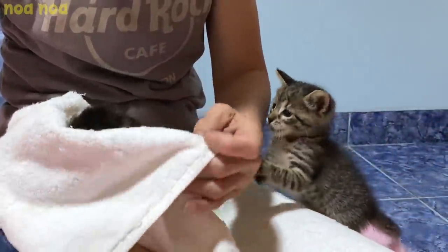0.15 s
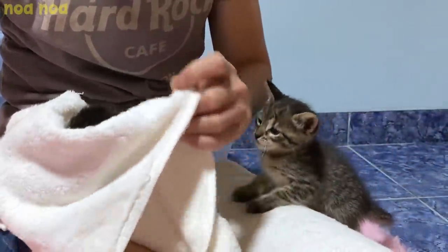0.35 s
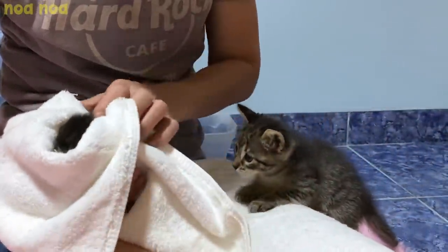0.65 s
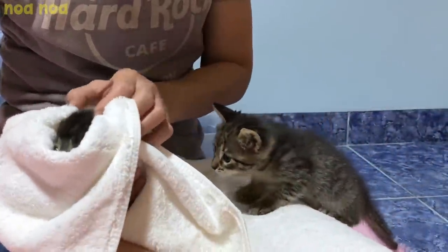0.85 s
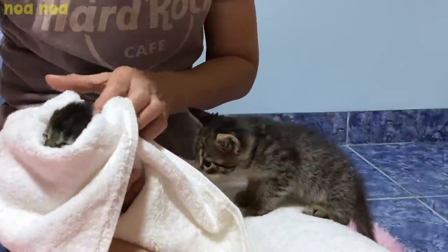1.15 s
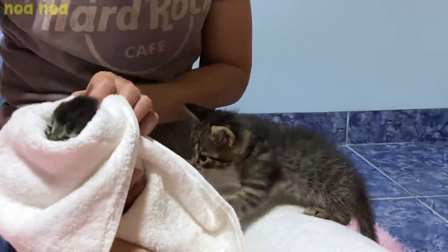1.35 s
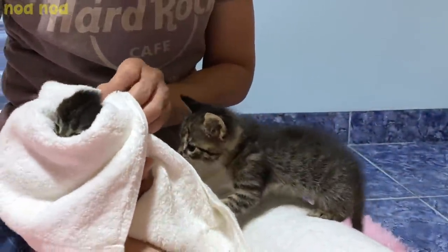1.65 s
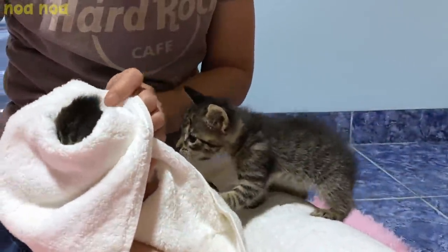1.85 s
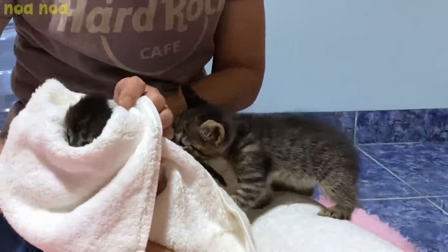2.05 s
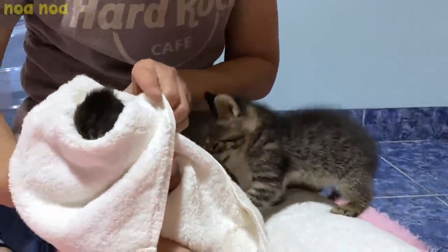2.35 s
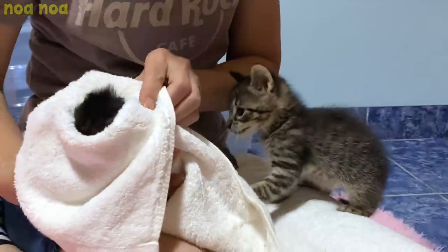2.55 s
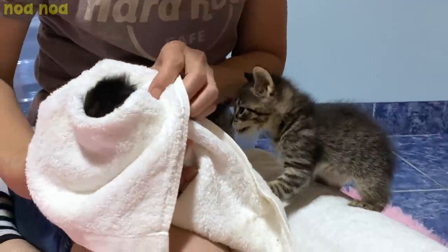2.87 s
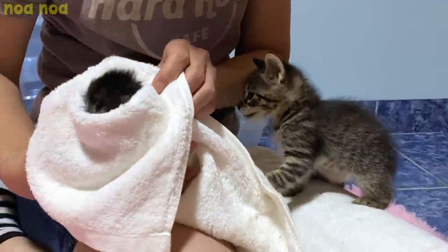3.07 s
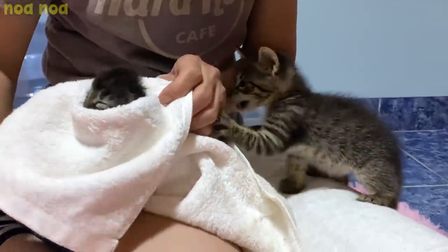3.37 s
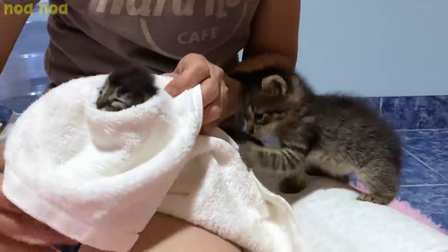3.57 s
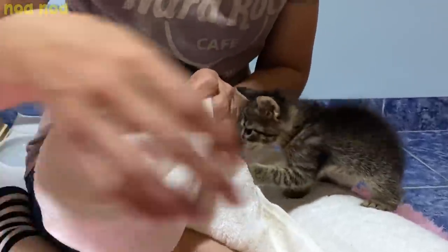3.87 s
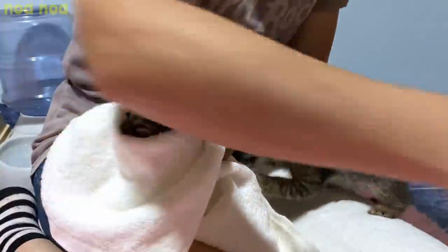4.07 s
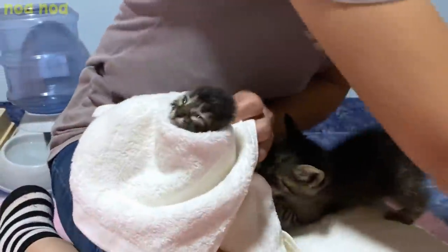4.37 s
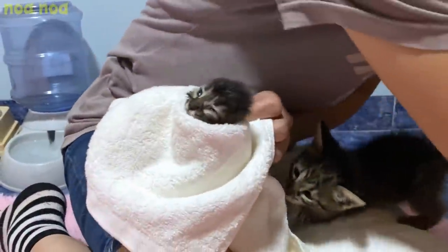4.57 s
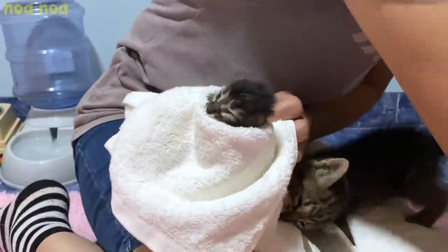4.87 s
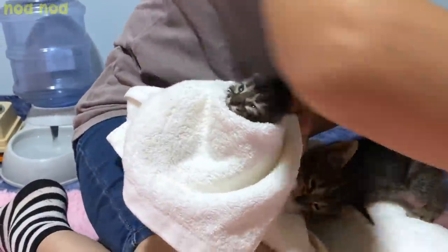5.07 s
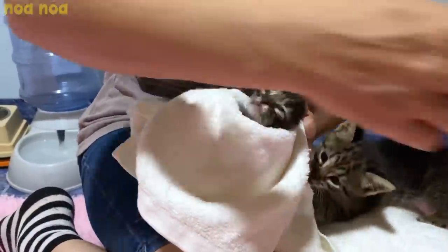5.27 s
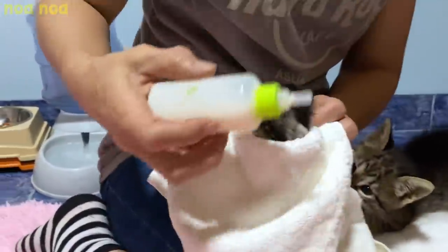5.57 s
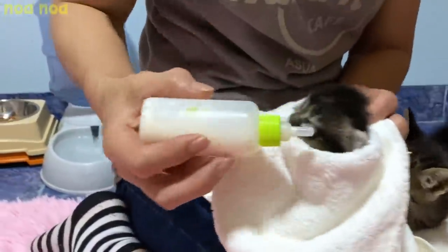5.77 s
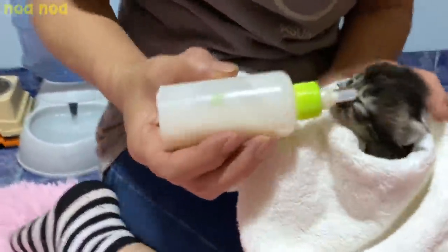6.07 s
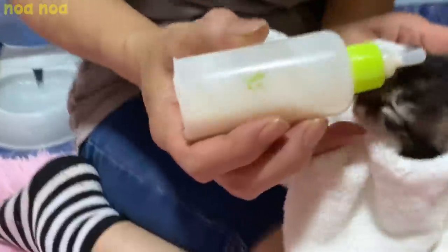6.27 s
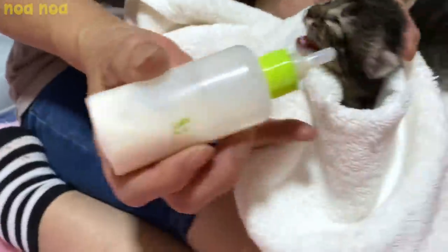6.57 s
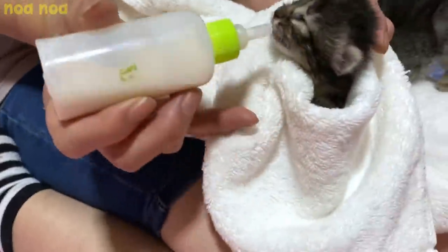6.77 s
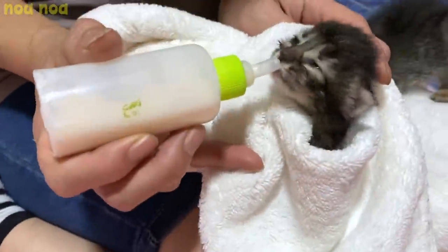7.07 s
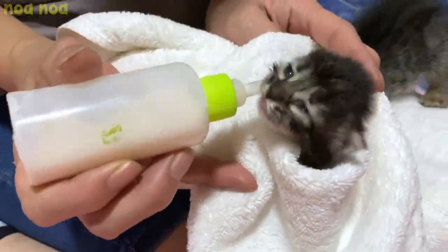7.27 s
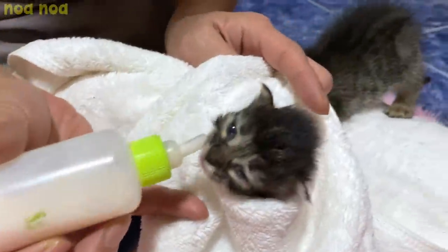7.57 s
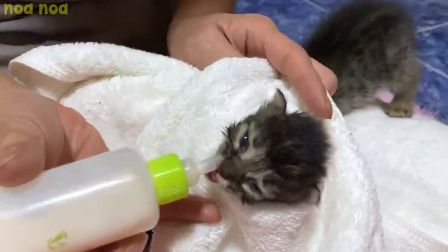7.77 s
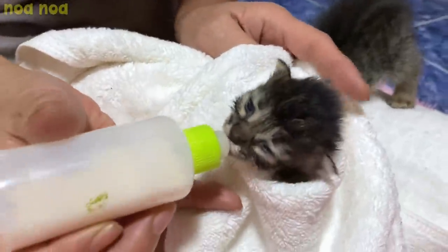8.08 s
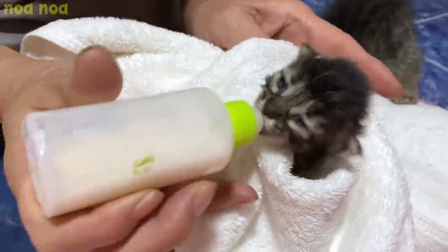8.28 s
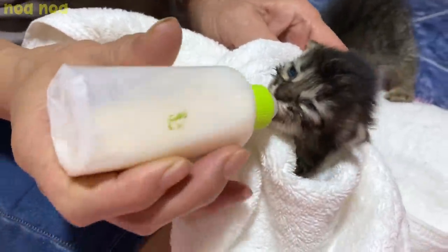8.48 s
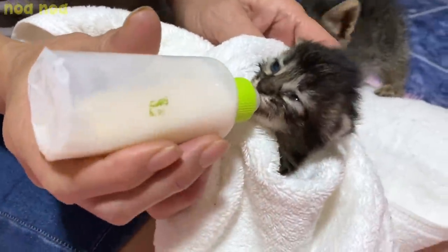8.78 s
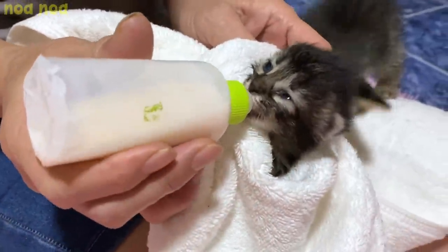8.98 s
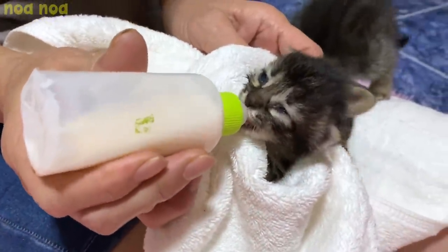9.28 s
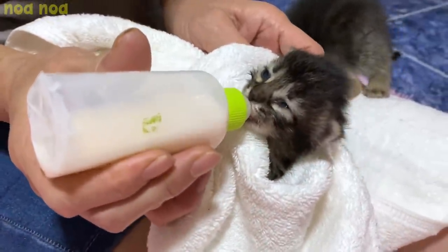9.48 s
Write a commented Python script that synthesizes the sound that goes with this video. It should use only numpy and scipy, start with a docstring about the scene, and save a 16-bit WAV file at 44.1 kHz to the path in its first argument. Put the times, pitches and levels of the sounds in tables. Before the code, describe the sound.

High-pitched kitten mews, each rising quickly and drooping away, sound close to a stereo microphone in a tiled room. The first few come alone from slightly right; then cloth rustles, soft knocks and small clicks accompany a bottle being brought in. A second kitten adds shorter, higher cries, overlapping the first twice. Later mews of the first lean left, over faint low handling rumble.

```python
"""Two kittens in a tiled room

Two kittens mew while one is wrapped in a towel and offered a bottle; twice the cries overlap.
Each mew: harmonics on a high arch of pitch, coloured by a mouth that opens and shuts, plus rough air.
Towel and handling rumble: shaped noise with moving level. Ticks and bumps: short noise bursts.
A brief sine hums once; mews, ticks and bumps also feed a room of echoes and decaying noise."""
import sys
import numpy as np
from scipy import signal
from scipy.fft import rfft, irfft, next_fast_len
from scipy.io import wavfile
from scipy.ndimage import uniform_filter1d

SR = 44100
rng = np.random.default_rng(int(sys.argv[2]) if len(sys.argv) > 2 else 0)


def transcribe(signal):
    """Save signal, clipped to [-1, 1], as a 16-bit WAV file at the path in sys.argv[1]."""
    frames = np.atleast_2d(signal).T
    limited = np.clip(frames, -1, 1)
    pcm = np.round(limited * 32767).astype(np.int16)
    wavfile.write(sys.argv[1], SR, pcm)


N = 424683
TIME = np.arange(N) / SR


def gain_of(db):
    """Decibels to amplitude."""
    return 10 ** (np.asarray(db) / 20)


def evened(x):
    """Scales to rms 1."""
    return x / np.sqrt(np.mean(x ** 2) + 1e-20)


def read(points, hz, axis=1):
    """Interpolates one column of a table on a log-frequency axis."""
    points = np.array(points)
    return np.interp(np.log(hz + 1), np.log(points[:, 0]), points[:, axis])


def ramp(t, length_s):
    """Rises from 0 at t = 0 to 1 at t = length_s, and stays there."""
    return np.clip(t / max(length_s, 1e-3), 0, 1)


def add(mix, start_s, sound):
    """Mixes a sound in at start_s."""
    part = mix[..., max(round(start_s * SR), 0):][..., :sound.shape[-1]]
    part += sound[..., :part.shape[-1]]


def delayed(x, ms):
    """Circular fractional delay, by a phase slope; negative ms advances."""
    size = next_fast_len(len(x))
    hz = np.fft.rfftfreq(size, 1 / SR)
    return irfft(rfft(x, size) * np.exp(-2j * np.pi * hz * ms / 1000), size)[:len(x)]


def noise(size, shape_db):
    """Noise of rms 1 with the spectrum shape_db(Hz)."""
    fft_size = next_fast_len(size)
    hz = np.fft.rfftfreq(fft_size, 1 / SR)
    white = rfft(rng.standard_normal(size + 2), fft_size)
    return evened(irfft(white * gain_of(shape_db(hz)), fft_size)[:size])


def wander(size, rate_hz):
    """Smooth random drift of rms 1, up to about rate_hz."""
    return noise(size, lambda hz: -20 * np.log10(1 + (hz / rate_hz) ** 3))


# Reverberation time by band: (f/Hz, t60/s)
ROOM_T60 = [(500, 0.26), (3000, 0.3), (7000, 0.22), (15000, 0.22)]


def room(x, early_db=-12, tail_db=-11, dull_hz=5500):
    """Early echoes off floor and wall, then a noise tail in which each band dies at its own speed."""
    size = SR * 3 // 4
    hz, t, bands = signal.stft(rng.standard_normal((2, size)), SR, nperseg=256)
    decay = gain_of(-60 * t / read(ROOM_T60, hz)[:, None])
    tail = signal.istft(bands * decay, SR, nperseg=256)[1]
    tail *= ramp(np.arange(tail.shape[1]) / SR, 0.016)
    # the tail is duller in the treble than the direct sound
    dulled = signal.lfilter(*signal.butter(1, dull_hz, fs=SR), tail / np.linalg.norm(tail[0]))
    response = gain_of(tail_db) * dulled
    for side in response:
        at = (SR * rng.uniform(.002, .016, size=8)).astype(int)
        side[at] += gain_of(early_db) * rng.choice([-1, 1], len(at)) / np.sqrt(len(at))
    return signal.fftconvolve(x[None], response, axes=1)[:, :N]


# Rumble spectrum, relative: (f/Hz, level/dB)
RUMBLE_SPECTRUM = [(20, -81.5), (35, -19.5), (50, -8.5), (72, 4), (95, -9), (135, -14.5), (166, -11),
                   (195, -24), (250, -26.5), (330, -40.5), (600, -82)]
# Rumble of the grip over time: (t/s, level/dB)
GRIP_LEVEL = [(0.15, -44), (0.2, -47), (4.18, -55.5), (4.21, -48), (6.06, -49.5), (6.46, -43.5),
              (8.58, -49.5), (8.79, -37.5), (9.55, -41)]


def rumble(apart_hz=480, lean_db=1.5, lumps_db=2.0):
    """Grip of a hand: lumpy bass; the deeper it is, the more alike in both channels."""
    shared, own = (noise(N, lambda hz: read(RUMBLE_SPECTRUM, hz)) for _ in "LR")
    own = signal.lfilter(*signal.butter(1, apart_hz, "high", fs=SR), own)
    level = gain_of(np.interp(TIME, *np.transpose(GRIP_LEVEL)) + lumps_db * wander(N, 3.3))
    return level * np.array([shared + own, shared - own]) * gain_of([[-lean_db], [lean_db]])


# Towel spectrum, relative: (f/Hz, level/dB)
TOWEL_SPECTRUM = [(150, -11.5), (300, 3), (700, -3.5), (1500, -5.5), (3500, -15.5), (7000, -23),
                  (15000, -27)]
# Rustle over time, before the layer gain: (t/s, level/dB)
RUSTLE_LEVEL = [(0, -75), (3, -75), (4.9, -75.5), (5.25, -62.5), (5.7, -73.5), (6.3, -71), (7.1, -79),
                (9.63, -77)]


def towel(level_db=4, apart=0.84, strokes_db=1.1, grain_db=2):
    """Fibres rub in slightly uneven strokes, each a clump of tiny slips."""
    shared, own = (noise(N, lambda hz: read(TOWEL_SPECTRUM, hz)) for _ in "LR")
    unevenness_db = strokes_db * wander(N, 8) + grain_db * wander(N, 140)
    level = gain_of(level_db + np.interp(TIME, *np.transpose(RUSTLE_LEVEL)) + unevenness_db)
    return level * np.array([shared + apart * own, shared - apart * own])


def knocks(table, decay_s, octaves, wet_db):
    """Each knock is a decaying noise burst around its own centre frequency, dry plus room."""
    out, t = np.zeros((2, N)), np.arange(4096) / SR
    for start_s, peak_db, centre_hz in table:
        def band_db(hz):
            """Steep-sided band about the centre."""
            return -10 * np.log10(1 + (np.log2((hz + 1) / centre_hz) / octaves) ** 6)
        for side in out:
            burst = noise(len(t), band_db) * np.exp(-t / decay_s)
            add(side, start_s, gain_of(peak_db) * burst / abs(burst).max())
    return out + gain_of(wet_db) * room(out.mean(0))


# Ticks of claws, bottle and lips: (t/s, dry peak level/dB, centre f/Hz)
TICK_EVENTS = [(.193, -45, 6200), (.998, -52, 5100), (1.32, -54, 5700), (1.878, -74, 3800),
               (4.19, -53, 5470), (6.073, -50.5, 3640), (6.118, -46, 4500), (6.364, -42, 2500),
               (7.179, -50.5, 2840), (8.243, -62.5, 2435), (8.591, -49.5, 4700), (8.632, -52, 2460),
               (9.386, -52, 1520), (9.517, -49, 2570), (9.553, -55, 1600), (9.599, -54.5, 1600)]


def ticks():
    """Small hard contacts: very short bursts."""
    return knocks(TICK_EVENTS, decay_s=0.0028, octaves=0.87, wet_db=7.5)


# Folds are slack and quiet at both ends of a mew
SLACK_HZ, SLACK_DB, SCOOP_BEND, DROP_BEND = 561, -7, 1.3, 1.1


def cry_tension(t, start_s, length_s, note):
    """How taut the folds are, 0-1: a rounded rise before the note and a drop after it."""
    scoop = 1 - (1 - ramp(t, note[0][0] - start_s)) ** SCOOP_BEND
    drop = 1 - (1 - ramp(length_s - t, start_s + length_s - note[-1][0])) ** DROP_BEND
    return scoop * drop


SOFT_DB, CATCH_S, SWELL_DB = -12.5, .03, -7


def cry_effort(t, length_s, lead_s, swell_s, hold_s, fade_db):
    """Decibels relative to full voice: soft lead-in, catch, swell, hold and fade."""
    catch_db = SOFT_DB * (1 - ramp(t - lead_s, CATCH_S))
    rise_db = SWELL_DB * (1 - ramp(t - lead_s, swell_s))
    fade_at_s = lead_s + swell_s + hold_s
    return catch_db + rise_db + fade_db * ramp(t - fade_at_s, length_s - fade_at_s)


# AJAR: opening before the voice catches, as a share of the widest
AJAR, OPEN_S = 0.21, 0.04


def cry_mouth(t, lead_s, widest, close_at_s, closing_s):
    """Mouth opening 0-1: opens as the voice catches, then closes exponentially from close_at_s."""
    opening = AJAR + (1 - AJAR) * ramp(t - lead_s, OPEN_S)
    return np.clip(widest * opening * np.exp(-np.maximum(t - close_at_s, 0) / closing_s), 0, 1)


CLEAN, HOARSE, GAPE_POWER, ROUGH_PER_OCTAVE_PER_S = 0.0081, 0.22, 5.1, 0.013
# Cracks into a rasp, in any voice then sounding: (t/s, length/s, peak extra roughness/0-1)
RASP_EVENTS = [(4.341, 0.11, .3), (6.58, 0.0665, 0.25), (6.83, 0.096, 0.48), (7.89, 0.1, 0)]


def cry_roughness(clock_s, pitch_hz, mouth):
    """Roughness 0-1: grows with a gaping mouth, fast pitch slides and voice cracks."""
    slide = uniform_filter1d(abs(np.gradient(np.log2(pitch_hz))) * SR, size=1000)  # octaves/s
    cracks = sum(extra * np.sin(np.pi * ramp(clock_s - start_s, length_s))
                 for start_s, length_s, extra in RASP_EVENTS)
    gape = HOARSE * mouth ** GAPE_POWER
    return np.clip(CLEAN + gape + ROUGH_PER_OCTAVE_PER_S * slide + cracks, 0, 1)


# A soft voice is duller: dB per octave of overtone, per dB of effort given up
DULLING = 0.039


def mew(row, note, throat, waver=0.0028, jitter=0.095, flutter_db=1.5, shimmer_db=2.0, rasp=0.46,
        hiss_db=-17, air_db=-9, air_hz=3400):
    """Harmonics of tiny vocal folds, coloured by the mouth; hoarseness shakes pitch and strength."""
    start_s, end_s, lead_s, swell_s, hold_s, full_db, fade_db, widest, close_at_s, closing_s = row
    length_s = end_s - start_s
    t = np.arange(0, length_s, 1 / SR)
    size = len(t)

    tension = cry_tension(t, start_s, length_s, note)
    note_hz = np.interp(start_s + t, *np.transpose(note))
    pitch_hz = SLACK_HZ + tension * (note_hz - SLACK_HZ)
    drive_db = cry_effort(t, length_s, lead_s, swell_s, hold_s, fade_db) + SLACK_DB * (1 - tension)
    mouth = cry_mouth(t, lead_s, widest, close_at_s, closing_s)
    rough = cry_roughness(start_s + t, pitch_hz, mouth)

    shake = 1 + waver * wander(size, 35.9) + jitter * rough ** 2 * wander(size, 220)
    pitch_hz = uniform_filter1d(pitch_hz, size=300) * shake
    phase = 2 * np.pi * np.cumsum(pitch_hz) / SR
    voice = np.zeros(size)
    for k in np.arange(1, 13):
        harmonic_hz = k * pitch_hz
        colour_db = (1 - mouth) * read(throat, harmonic_hz) + mouth * read(throat, harmonic_hz, axis=2)
        colour_db += shimmer_db * np.sqrt(k / 4) * wander(size, 16)  # higher overtones: less steady
        colour_db += DULLING * drive_db * np.log2(k)
        voice += gain_of(colour_db) * np.cos(k * phase) * (harmonic_hz < SR / 2)
    voice *= gain_of(flutter_db * wander(size, 32)) * (1 + rasp * rough * wander(size, 220))

    def air_shape_db(hz):
        """Mean throat colour, rolled off at both ends."""
        throat_db = (read(throat, hz) + read(throat, hz, axis=2)) / 2
        return throat_db - 20 * np.log10(1 + (450 / (hz + 1)) ** 2 + (hz / air_hz) ** 2)

    air = noise(size, air_shape_db)
    # turbulence in the mouth
    hiss = noise(size, lambda hz: -10 * np.log10(1 + (7000 / (hz + 1)) ** 4))
    voice += gain_of(air_db) * rough * (air + gain_of(hiss_db) * hiss)
    ease = np.minimum(np.minimum(t, length_s - t) / .022, 1)
    return start_s, np.sqrt(2) * gain_of(full_db + drive_db) * voice * ease


def kitten(mews, notes, throat, level_db, wet_db):
    """One kitten's cries reach the two channels a moment apart, and fill the room."""
    voice, channels = np.zeros(N), np.zeros((2, N))
    for (*row, side_db, lag_ms), note in zip(mews, notes):
        start_s, cry = mew(row, note, throat)
        add(voice, start_s, cry)
        pair = np.array([delayed(cry, lag_ms), cry])
        add(channels, start_s, pair * gain_of([[side_db / 2], [-side_db / 2]]))
    return gain_of(level_db) * (channels + gain_of(wet_db) * room(voice))


# Throat colour: (f/Hz, mouth-shut level/dB, mouth-wide level/dB)
FIRST_COLOUR = [(614, 3.5, -14.5), (1274, -7.5, -21), (1706, 4, -15), (2810, 0.5, -1.5), (2927, -0.5, 3),
                (4210, -26, 8.5), (4686, -17, -1), (7130, -24, -2), (8450, -43, -14.5), (12200, -24.5, -28),
                (15000, -39.5, -36.5)]
# Mews, before the kitten's gain: (start t/s, end t/s, lead-in/s, swell/s, hold/s, effort level/dB,
#   fade by end/dB, widest mouth/0-1, closing starts after/s, closing time constant/s,
#   left minus right level/dB, left lag/ms)
FIRST_CRIES = [(.42, .98, 0.071, 0.16, 0.033, -37, -25.5, 0.59, 0.24, 0.074, -2, 0.15),
               (2.03, 2.92, 0.09, 0.014, 0.32, -33, -34, 0.56, 0.27, 0.11, -2.5, 0.13),
               (3.2, 4.02, 0.022, 0.15, 0.25, -31.5, -19.5, 0.91, .28, 0.38, -2, .17),
               (4.33, 5.07, 0.0017, .33, 0.013, -33.5, -23.5, 0.95, 0.2, 0.26, -4.5, 0.15),
               (5.33, 5.96, 0.027, 0.27, 0.042, -32.5, -17.5, 0.99, 0.26, 0.58, -6, 0.2),
               (7.27, 8.08, 0.058, 0.25, 0.33, -31, -14, 0.73, 0.75, 0.1, 3, -0.12),
               (8.65, 9.3, 0.092, .13, 0.21, -32, -23, 0.73, 0.37, 0.13, 3, 0.066)]
# Held note, one list a mew: (t/s, f/Hz)
FIRST_PITCHES = [
    [(0.52, 1387), (0.602, 1315), (0.644, 1383), (0.71, 1175), (0.762, 1123), (0.798, 1043), (0.82, 1043),
     (0.91, 972)],
    [(2.09, 1464), (2.146, 1295), (2.216, 1354), (2.522, 1204), (2.62, 1007), (2.682, 1031), (2.72, 914),
     (2.83, 830)],
    [(3.3, 1425), (3.494, 1381), (3.566, 1279), (3.654, 1313), (3.688, 1205), (3.75, 1209), (3.786, 1283),
     (3.95, 1174)],
    [(4.485, 1410), (4.579, 1515), (4.667, 1400), (4.823, 1115), (4.841, 1124), (4.893, 977), (4.949, 999),
     (4.96, 960)],
    [(5.39, 1233), (5.45, 1370), (5.466, 1362), (5.506, 1452), (5.668, 1281), (5.734, 1316), (5.812, 1130),
     (5.89, 1060)],
    [(7.36, 1312), (7.428, 1387), (7.504, 1404), (7.54, 1457), (7.61, 1442), (7.816, 1300), (7.916, 1405),
     (7.99, 1245)],
    [(8.75, 1305), (8.838, 1503), (8.926, 1531), (9.028, 1499), (9.16, 1248), (9.17, 1204), (9.19, 1188),
     (9.21, 1120)],
]


def first_kitten():
    """Seven mews through the first throat."""
    return kitten(FIRST_CRIES, FIRST_PITCHES, FIRST_COLOUR, level_db=-7.5, wet_db=10.5)


# Throat colour: (f/Hz, mouth-shut level/dB, mouth-wide level/dB)
SECOND_COLOUR = [(600.0, 31.5, -49), (1275, 10.5, -26), (1750, 14, -7.5), (2940, -10, 36.5),
                 (3540, -29, 36.5), (5300, -4, -32), (6900, -24, 21), (8030, -51, 4), (11000, -25.5, -3.5),
                 (15000.0, -45, -11)]
# Mews, before the kitten's gain: (start t/s, end t/s, lead-in/s, swell/s, hold/s, effort level/dB,
#   fade by end/dB, widest mouth/0-1, closing starts after/s, closing time constant/s,
#   left minus right level/dB, left lag/ms)
SECOND_CRIES = [(4.75, 5.21, 0.02, 0.095, 0.12, -52.5, -18, 0.19, 0.15, 0.058, 2, -0.065),
                (6.375, 6.895, 0.027, 0.13, 0.15, -32.5, -27.5, 0.42, .26, 0.11, 1.5, -0.068),
                (7.665, 8.085, 0.04, 0.17, .04, -31.5, -8, 0.5, .33, 0.18, 7.5, -0.13)]
# Held note, one list a mew: (t/s, f/Hz)
SECOND_PITCHES = [
    [(4.86, 1240), (4.92, 1315), (5.004, 1239), (5.092, 955), (5.16, 931)],
    [(6.45, 1554), (6.512, 1915), (6.552, 1957), (6.592, 1890), (6.602, 1695), (6.652, 1540), (6.666, 1661),
     (6.756, 1581), (6.77, 1557)],
    [(7.76, 1468), (7.834, 1839), (7.864, 1792), (7.884, 1744), (7.898, 1479), (8.0, 1251)],
]


def second_kitten():
    """Three mews through the second throat."""
    return kitten(SECOND_CRIES, SECOND_PITCHES, SECOND_COLOUR, level_db=-8.5, wet_db=1.0)


# Soft knocks of hand and bottle in the towel: (t/s, dry peak level/dB, centre f/Hz)
BUMP_EVENTS = [(5.205, -46.5, 830), (5.98, -49, 371), (6.12, -44.5, 442), (6.19, -53, 417),
               (7.385, -43.5, 640), (8.095, -45, 540), (9.511, -53, 680)]


def bumps():
    """Contacts muffled by the towel: longer, lower bursts."""
    return knocks(BUMP_EVENTS, decay_s=0.029, octaves=0.47, wet_db=-1.0)


def low_hum(start_s=5.462, length_s=0.14, hz=167, end_db=-39.0, fade_db=6):
    """A brief low hum, a steady resonance near 167 Hz, swells and fades; same in both channels."""
    out, t = np.zeros(N), np.arange(0, length_s, 1 / SR)
    level = gain_of(end_db + fade_db * (1.0 - t / length_s)) * np.sin(np.pi * t / length_s)
    add(out, start_s, level * np.sin(2 * np.pi * hz * t))
    return out


def scene():
    """Both kittens over the sounds of handling."""
    handling = rumble() + towel() + ticks() + bumps() + low_hum()
    return handling + first_kitten() + second_kitten()


EDGE_HZ = 15900


def record(dry):
    """Band limit: linear-phase low-pass at EDGE_HZ."""
    lowpass = signal.firwin(511, EDGE_HZ, window=("kaiser", 9), fs=SR)
    return signal.oaconvolve(dry, lowpass[None], "same")


dry = scene()
out = record(dry)
transcribe(out)
```